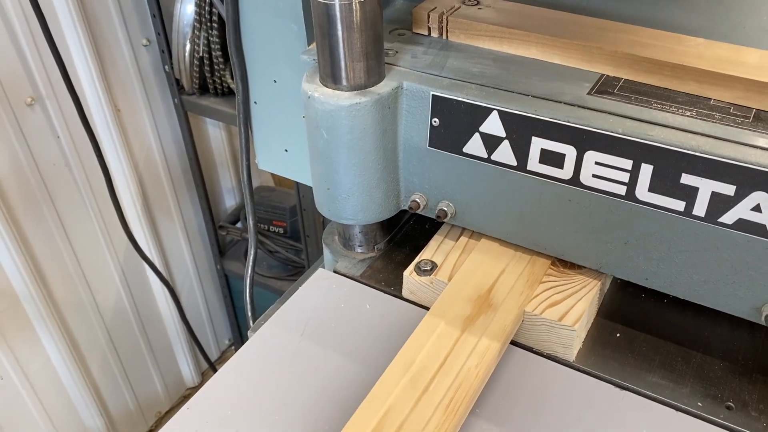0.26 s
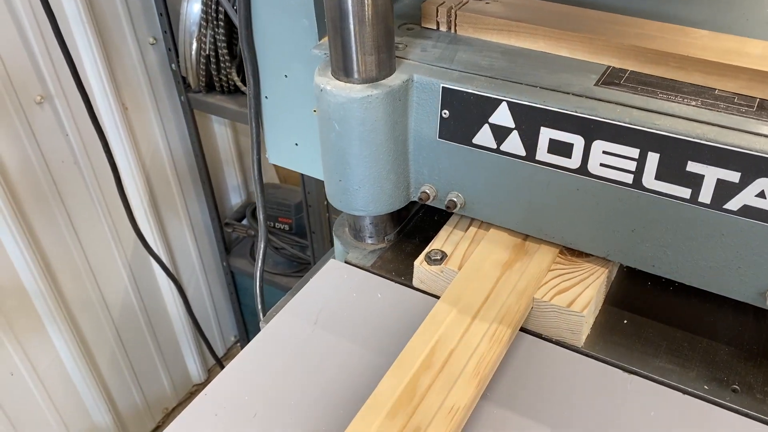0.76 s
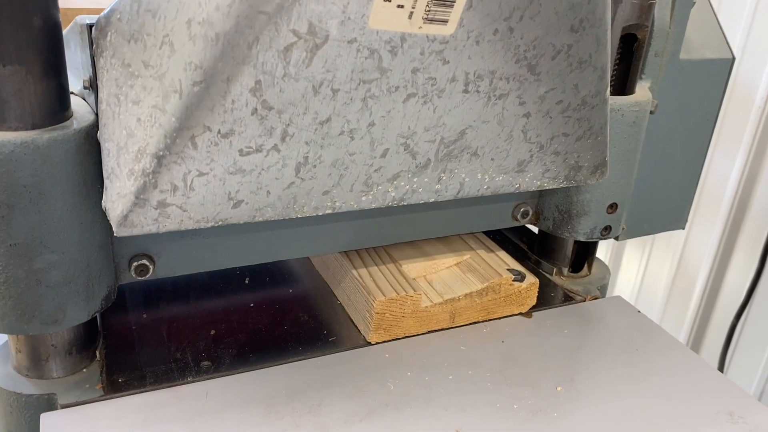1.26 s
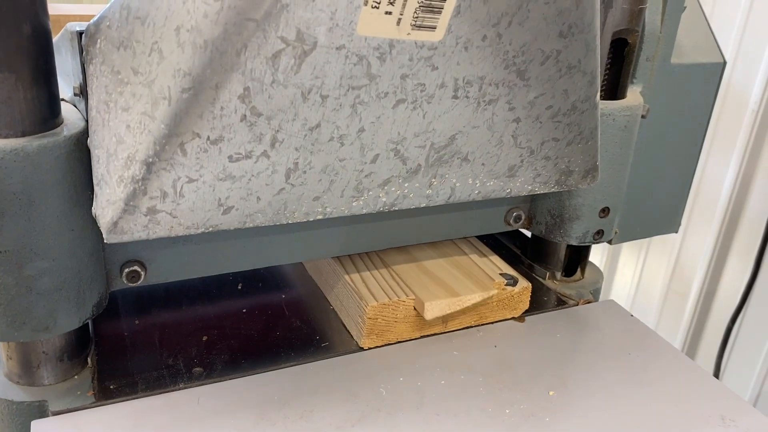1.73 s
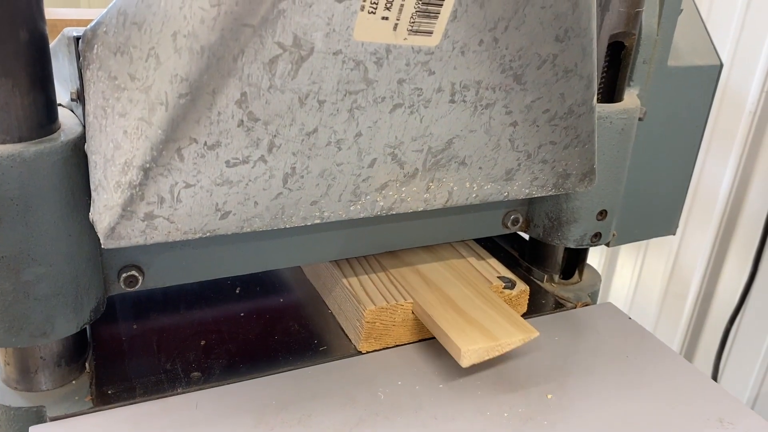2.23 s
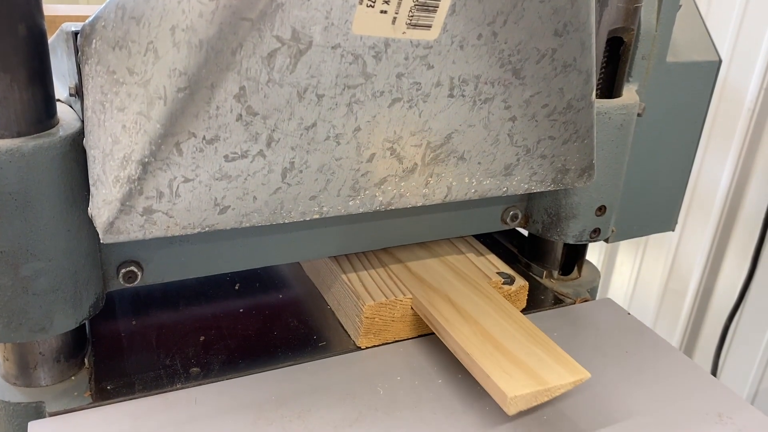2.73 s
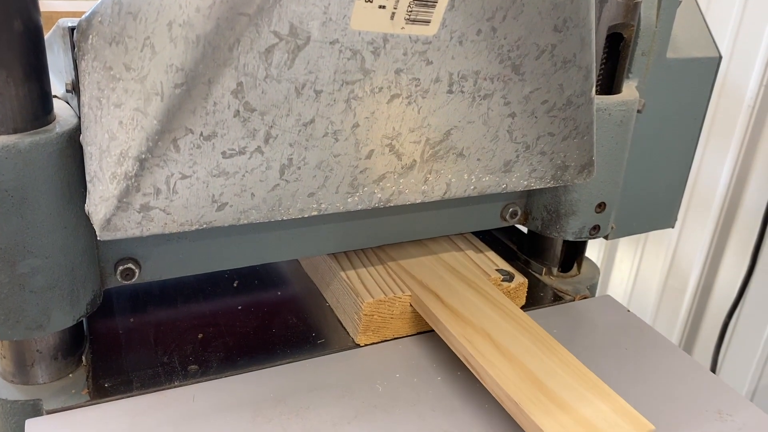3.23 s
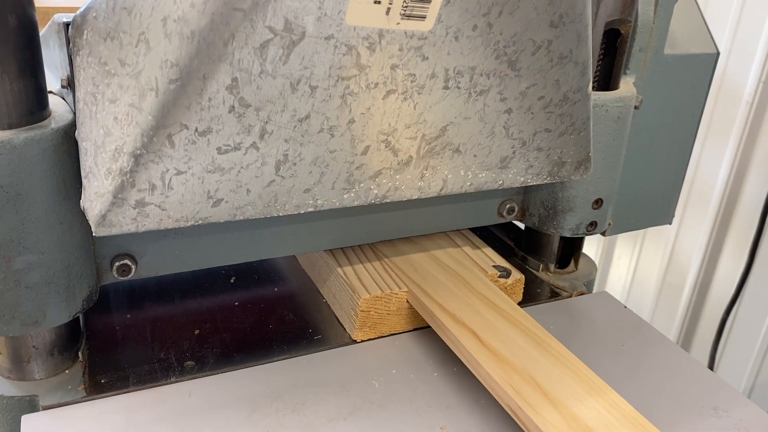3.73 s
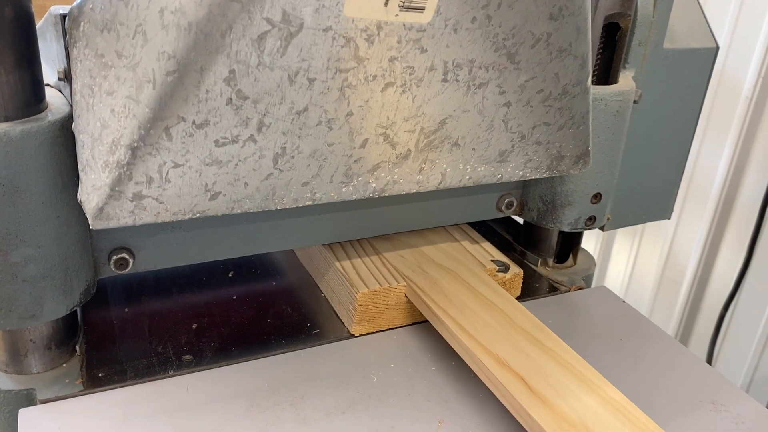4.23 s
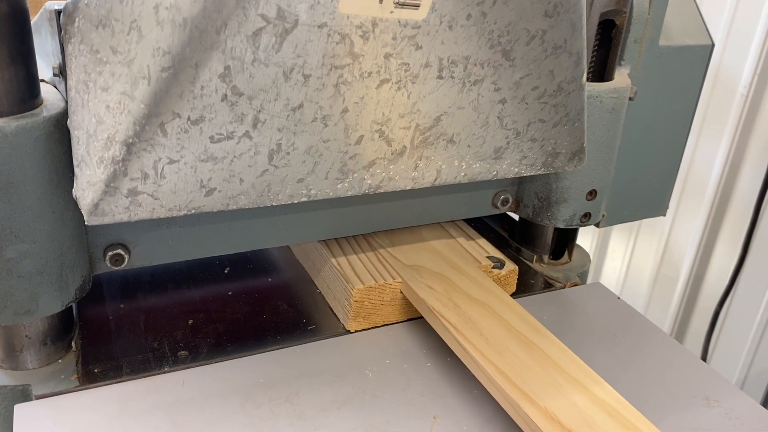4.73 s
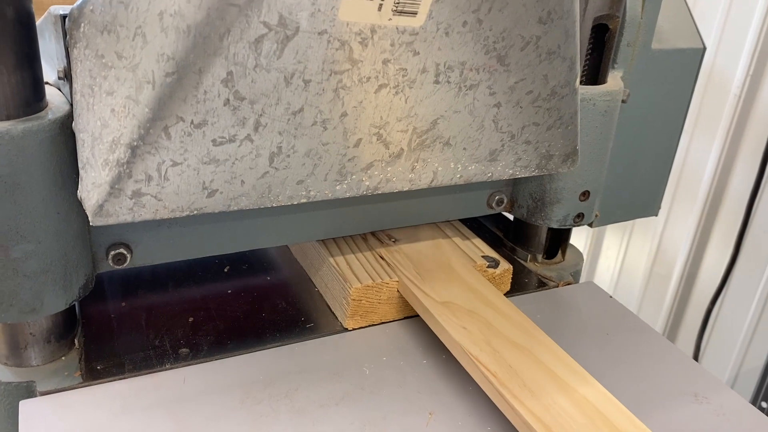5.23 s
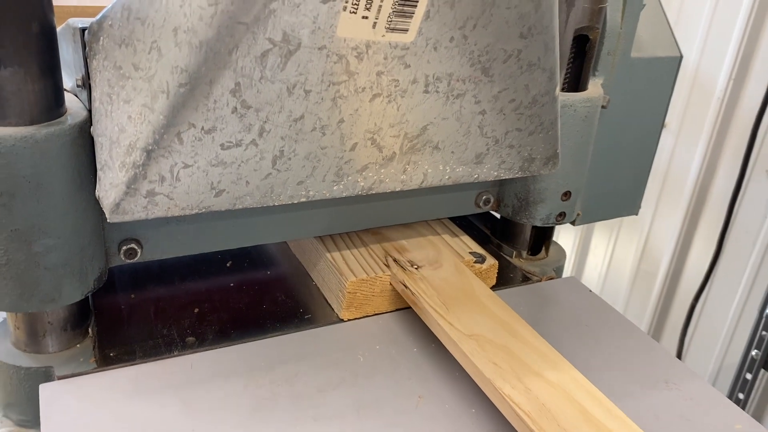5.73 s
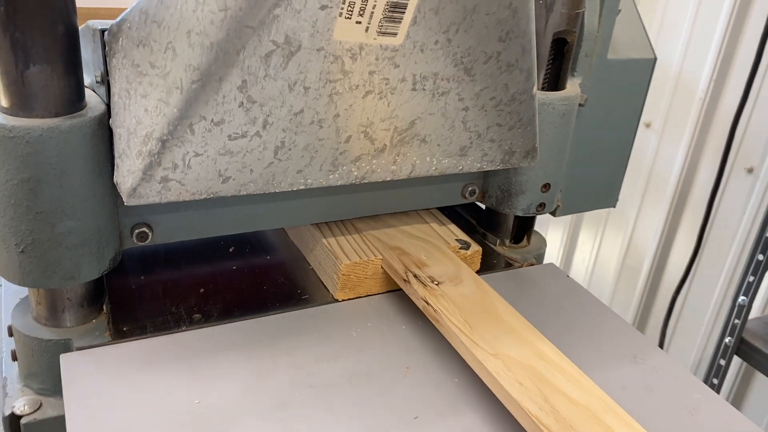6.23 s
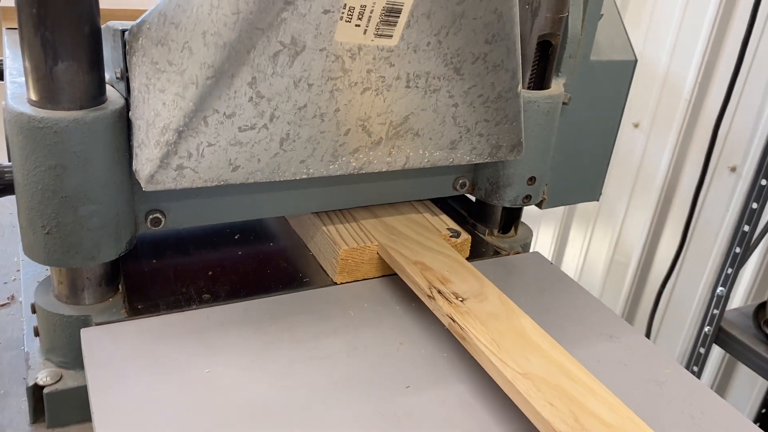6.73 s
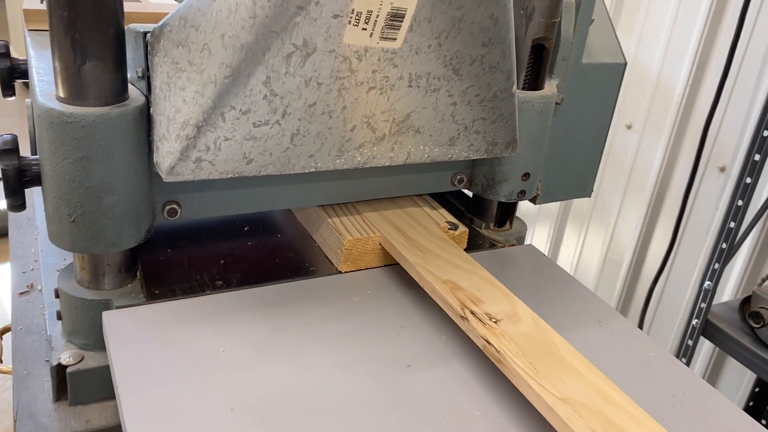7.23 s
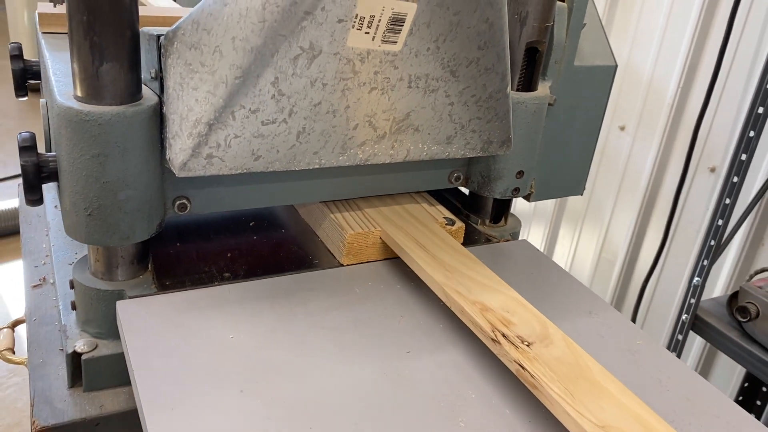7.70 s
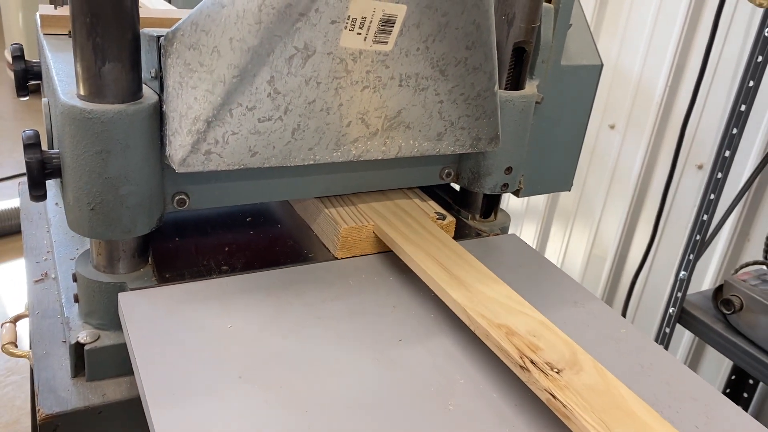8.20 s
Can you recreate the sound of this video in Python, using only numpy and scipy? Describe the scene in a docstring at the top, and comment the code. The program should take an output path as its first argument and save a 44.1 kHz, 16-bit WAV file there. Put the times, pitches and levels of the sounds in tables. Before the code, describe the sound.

Steady whine and buzz of a wood planer cutting a board, chips hissing and a few splinters snapping midway.

```python
"""A planer shaving a board

A three-knife thickness planer in a workshop is heard briefly where the board goes in (infeed), then
where it comes out (outfeed), by a hand-held pair of microphones that slowly backs away. Knife strokes
give a stack of tones, uneven knives the tones between. Chips hiss and tick in the hood over a roar
and a motor hum. The board slaps the table at first; later its grain tears and splinters break off."""
import sys
import numpy as np
from scipy import signal
from scipy.fft import rfft, irfft, next_fast_len
from scipy.io import wavfile
from scipy.ndimage import uniform_filter1d, map_coordinates

SR = 44100
rng = np.random.default_rng(int(sys.argv[2]) if len(sys.argv) > 2 else 0)


def wav_out(sig):
    """Save sig, one row per channel (or a flat mono array), as 16-bit PCM at SR to the path in sys.argv[1]."""
    wavfile.write(sys.argv[1], SR, np.round(np.clip(np.atleast_2d(sig).T, -1, 1) * 32767).astype(np.int16))


N = 373023
HOP, TURN_SAMPLES = 512, 2048  # samples per frame, and per stored turn of the cutter head
BIN_HZ = np.fft.rfftfreq(2048, 1 / SR)
MOVE_S = .83  # the listener jumps from infeed to outfeed
KNIFE_COUNT, INFEED_TURN_HZ, OUTFEED_TURN_HZ = 3, 106.86, 106.585
ORDERS = np.arange(148)  # the tone of order k vibrates k times per turn
# Tones that fade and swell on their own: order
FADING_ORDERS = (15, 18, 21, 24, 27, 30, 33, 36, 39, 45, 48, 51, 54, 57, 25, 28, 49, 52, 60, 42)


def amp(db):
    """Turn decibels into a gain."""
    return 10 ** (np.asarray(db) / 20)


def evened(x):
    """Scale a signal to an average power of 1."""
    return x / np.sqrt(np.mean(abs(x) ** 2) + 1e-20)


def at_pitch(table, hz):
    """Look up a table's value at any pitch."""
    pitches, values = np.transpose(table)
    return np.interp(np.log(hz + 1), np.log(pitches + 1), values)


def curves(table, t):
    """Join a table's timed points with straight lines."""
    times, *columns = np.transpose(table)
    return np.array([np.interp(t, times, column) for column in columns])


def drift(shape, frames):
    """Random wandering; more frames make it slower."""
    steps = rng.standard_normal(shape)
    return evened(uniform_filter1d(uniform_filter1d(steps, frames, axis=0), frames, axis=0))


def mic_phase(hz):
    """Half the phase lag of the left microphone; the spacing only matters in the treble."""
    agree_hz, repeat_hz = 6850, 4300
    return np.exp(1j * np.pi * np.maximum(hz - agree_hz, -600) / repeat_hz * (hz > 5000))


def stereo(x):
    """One source as the two microphones hear it."""
    size = next_fast_len(N)
    spectrum, phase = rfft(x, size), mic_phase(np.fft.rfftfreq(size, 1 / SR))
    return irfft(np.array([spectrum / phase, .8 * spectrum * phase]), size)[:, :N]


def noise(spectrum, level_db, patchy_db):
    """Noise with drifting loud patches, partly shared by both microphones."""
    # How alike the two sides are: pitch_hz, likeness (0-1)
    likeness = [(60, .97), (300, .96), (700, .7), (2000, .5), (5000, .75), (6500, .97), (15000, .99)]
    a, b, c, d = rng.standard_normal((4, len(level_db), len(BIN_HZ)))
    patches = evened(uniform_filter1d(drift(a.shape, frames=6), size=16, axis=1))
    same, left = at_pitch(likeness, BIN_HZ), a + 1j * b
    right = same * left + np.sqrt(1 - same ** 2) * (c + 1j * d)
    right *= amp(-2.4 * (abs(BIN_HZ - 3500) < 2500))  # the machine stands to the left
    colour, phase = amp(at_pitch(spectrum, BIN_HZ) + patchy_db * patches), mic_phase(BIN_HZ)
    spectra = evened(np.array([left / phase, right * phase]) * colour) * amp(level_db)
    sound = signal.istft(spectra.transpose(0, 2, 1), nperseg=2048, noverlap=2048 - HOP)[1]
    return sound[:, :N] / np.sqrt(2048 / 6)


def roughness(t):
    """Each stretch of cross grain ramps in, holds and ramps out."""
    # Cross grain: start_s, end_s, roughness (0-1)
    stretches = [(.58, .8, .2), (1.76, 1.9, .3), (2.95, 4.05, .9)]
    ramp_s = .08
    return sum(rough * np.clip(np.minimum(t - start, end - t) / ramp_s + .5, 0, 1)
               for start, end, rough in stretches)


def bite_share(order):
    """A deeper bite lifts most tones, but lowers those near order 29."""
    return 1 - 1.9 * np.exp(-((order - 29) / 3) ** 2)


def tone_fades(t):
    """As board and listener move, echoes cancel or lift single tones; the three brief dips of order 15 near 0.6
    s come as the board chatters on the infeed table."""
    # Dips and lifts, one list per fading order: centre_s, half_length_s, change_db
    fades = [
        [(.62, .012, -12), (.667, .012, -12), (.712, .012, -12), (3.1, .15, -9), (3.58, .13, -12),
         (5.15, .2, -11), (6.35, .35, -19), (7.8, .4, -10)],
        [(4.75, .17, -9), (5.5, .5, -6), (6.1, .15, -10), (6.95, .25, -17), (7.5, .17, -21)],
        [(1.3, .35, -7), (2.85, .2, -8), (3.7, .15, -8), (4.25, .17, -10), (5.7, .25, 5), (6.95, .17, -16),
         (7.9, .5, 7)],
        [(2.95, .35, 5), (5.6, .2, -9), (6.5, .3, -10), (7.4, .3, -9), (8.1, .3, -17)],
        [(1.45, .25, 12), (2.9, .15, 6), (4.5, .5, -6), (5.4, .3, 9), (7.9, .25, -7)],
        [(2.6, .25, 5), (4.6, .35, 7), (7.2, .4, 9)],
        [(1.1, .45, 7), (4.2, .25, 4), (5.7, .6, -7), (7.5, .9, -5)],
        [(4.55, .45, 4), (6.0, .5, -4), (7.5, .5, 5)],
        [(1.5, .3, -9), (2.3, .3, -12), (7.3, .2, 7), (8.0, .3, 6)],
        [(3.65, .35, -7), (7.75, .3, -9)],
        [(2.2, .4, 7), (4.8, .6, 6), (8.1, .3, 5)],
        [(1.0, .3, -12), (3.3, .4, -5), (7.6, .65, -21)],
        [(3.4, .5, -4)],
        [(1.2, .4, 5), (4.2, .2, -6)],
        [(4.6, .4, -10)],
        [(4.6, .4, -12)],
        [(7.6, 1.2, -13)],
        [(7.7, .9, -12)],
        [(6.2, 1.0, -8)],
        [(4.6, .4, 2)],
    ]
    change_db = np.zeros((len(t), len(ORDERS)))
    for order, rows in zip(FADING_ORDERS, fades):
        change_db[:, order] = sum(db * np.exp(-((t - at) / half) ** 2) for at, half, db in rows)
    return change_db


def whine(t, near_db, bite_db, wander):
    """The head's lower tones; mid is what both microphones share, side is how they differ."""
    # Knife stroke tones: order, infeed_db, outfeed_mid_db, outfeed_side_db, side_phase_rad
    knife_tones = [(3, -46.5, -50.0, -64, 4), (6, -50.5, -44.5, -49.5, 1.59), (9, -68, -48.5, -54, 0.7),
                   (12, -51.5, -50.5, -58.5, 1.5), (15, -42.5, -51.5, -55.5, 1.6),
                   (18, -52, -46, -52.5, 0.9), (21, -48.5, -49.0, -52.5, -0.6), (24, -50, -53, -54, 0.8),
                   (27, -54.5, -61.5, -61, 1), (30, -55, -59, -61, 0.3), (33, -61, -51.5, -61.0, -1.8),
                   (36, -59, -58.5, -59.5, 0), (39, -78, -53.5, -63, -3.3), (42, -64, -59.5, -68, -1.5),
                   (45, -76.0, -51, -69, -1), (48, -86, -62, -67, -0.5), (51, -64.5, -53, -57, 1),
                   (54, -66, -57.5, -55, -1.5), (57, -64, -59, -63.5, -0.3), (60, -68, -59, -63.0, 0)]
    # Tones from uneven knives and imbalance: order, infeed_db, outfeed_db
    shaft_tones = [(1, -63.0, -64), (13, -61, -74), (14, -59, -92), (16, -53, -77.5), (19, -64, -65),
                   (20, -58, -72), (22, -59, -60.5), (23, -71.0, -63), (25, -61.5, -61.5), (28, -57.5, -60),
                   (49, -75, -60), (50, -88, -64), (52, -75, -61), (55, -74, -72), (58, -72, -73)]
    outfeed = (t > MOVE_S)[:, None]
    # High orders fill the room, so distance dims them less.
    follow_db = np.outer(near_db, np.clip((45 - ORDERS) / 18, .2, 1))
    follow_db += np.outer(bite_db, (ORDERS >= 14) * bite_share(ORDERS))
    faded_db = follow_db + tone_fades(t)
    # Unlisted tones are faint, and stronger just above a knife tone than just below.
    faint_db = np.where(ORDERS % KNIFE_COUNT == 1, -68, -72) - 5 * (ORDERS < 18)
    mid_db = faint_db + faded_db + 1.5 * rng.standard_normal(len(ORDERS))
    orders, infeed_db, outfeed_db = np.transpose(shaft_tones)
    at = orders.astype(int)
    mid_db[:, at] = np.where(outfeed, outfeed_db, infeed_db) + faded_db[:, at]
    side_db = mid_db - np.clip(14 - ORDERS, 6, 14)
    side_rad = rng.uniform(0, 2 * np.pi, len(ORDERS))
    orders, infeed_db, outfeed_db, outfeed_side_db, phase_rad = np.transpose(knife_tones)
    at = orders.astype(int)
    mid_db[:, at] = np.where(outfeed, outfeed_db, infeed_db) + faded_db[:, at]
    side_db[:, at] = np.where(outfeed, outfeed_side_db, infeed_db - 5) + follow_db[:, at]
    side_rad[at] = phase_rad
    waver_db = np.where(np.isin(ORDERS, FADING_ORDERS), 1.5, 2.9) * wander
    mid = amp(mid_db + waver_db * drift(mid_db.shape, frames=14))
    side = amp(side_db + 3.5 * wander * drift(mid.shape, frames=30))
    side = side * np.exp(1j * (side_rad + .6 * wander * drift(mid.shape, frames=40)))
    return np.array([mid + side, mid - side])


def buzz(t, near_db, bite_db, bright):
    """The head's highest tones merge into a buzz, the knife stroke tones strongest."""
    # Buzz colour: pitch_hz, relative_db
    spectrum = [(6400, -4), (7500, 0), (9000, -9.5), (11000, -7), (13000, -12.5), (15700, -13)]
    hz = ORDERS * OUTFEED_TURN_HZ
    tone_db = at_pitch(spectrum, hz) + 8.5 * (ORDERS % KNIFE_COUNT == 0)
    tones = amp(tone_db + 4 * drift((len(t), len(hz)), frames=20)) * bright
    tones /= np.sqrt((tones ** 2).sum(1).mean())
    level_db = -47.7 + .8 * bite_db + .7 * near_db - 5 * (t < MOVE_S)
    # The top follows the bite more, the lower part the distance.
    tilt_db = np.outer(bite_db, .3 * (hz > 9000)) + np.outer(near_db, .25 * (hz < 9000))
    tones *= amp(level_db[:, None] + tilt_db)
    return np.array([tones / mic_phase(hz), tones * mic_phase(hz)])


def cutter_head(t, turns, near_db, bite_db):
    """Knives strike the wood: one turn's slowly changing wave repeats at the speed of the head."""
    shape, bright, infeed = (len(t), len(ORDERS)), ORDERS > 60, (t < MOVE_S)[:, None]
    wander = np.clip(ORDERS / 30, .03, 1.5)  # short waves feel every small move
    tones = whine(t, near_db, bite_db, wander) * ~bright + buzz(t, near_db, bite_db, bright)
    # Echoes smear the sharp stroke.
    smear_rad = np.where(bright, .8, 1.1) * rng.standard_normal(len(ORDERS))
    smear_rad = smear_rad + .6 * wander * drift(shape, frames=12)
    # The grain makes strokes uneven: neighbouring tones flutter together, high ones most.
    grain = evened(uniform_filter1d(drift(shape, frames=1), size=4, axis=1))
    unevenness = 1.5 + .7 * roughness(t)[:, None]
    flutter_db = unevenness * np.clip(ORDERS / 40, 0, 1.6) * grain
    # The board chatters on the infeed table, shaking low orders most.
    chatter_hz, chatter_db = 21.5, 4.5 * 8 / np.maximum(ORDERS, 8) * (ORDERS > 4)
    chatter = np.cos(2 * np.pi * chatter_hz * t[:, None] + rng.uniform(0, 2 * np.pi, len(ORDERS)))
    flutter_db += infeed * (chatter_db * chatter + 2.2 * (ORDERS > 10) * drift(shape, frames=1))
    smear_rad += .14 * unevenness * np.clip(ORDERS / 60, 0, 2.2) ** 2 * drift(shape, frames=2)
    tones *= amp(flutter_db) * np.exp(1j * smear_rad) * (ORDERS > 0)
    waves = irfft(tones, TURN_SAMPLES) * TURN_SAMPLES / np.sqrt(2)
    waves = np.concatenate([waves, waves[..., :1]], axis=2)  # close the loop
    place = [np.arange(N) / HOP, turns % 1 * TURN_SAMPLES]
    return np.array([map_coordinates(wave, place, order=1) for wave in waves])


def machine_roar(t, near_db):
    """A broad roar, with more deep rumble on the infeed side."""
    # Roar colour: pitch_hz, relative_db
    spectrum = [(30, -27), (55, -4), (110, 0), (160, -6), (220, 5), (340, -2), (420, -1.5), (1000, -3),
                (2500, -6.5), (6000, -27)]
    rumble_db = 5 * np.outer(t < MOVE_S, BIN_HZ < 100)
    return noise(spectrum, -54.5 + near_db[:, None] + rumble_db, patchy_db=1.0)


def motor(t, sample_s, near_db):
    """Motor, belt and feed gears hum, wavering in level."""
    # Hums: pitch_hz, level_db
    hums = [(199, -68.5), (350, -63), (700, -68), (746, -71), (1050, -72)]
    waver_db = near_db[:, None] + 4 * drift((len(t), len(hums)), frames=6)
    return sum(np.interp(sample_s, t, amp(db + waver_db[:, k])) * np.sin(2 * np.pi * hz * sample_s)
               for k, (hz, db) in enumerate(hums))


def chip_hiss(t, sample_s, turns, near_db, bite_db):
    """Chips fly in hissing bursts, one per knife stroke, louder in cross grain."""
    # Hiss colour: pitch_hz, relative_db
    spectrum = [(900, -6), (1500, -11), (2300, 6), (3600, 6.5), (5200, 7), (6200, 1.5), (7600, 2),
                (9000, -9), (11000, 0), (15700, -28)]
    stroke = (KNIFE_COUNT * turns).astype(int)
    stroke_db = (1.5 + 2.5 * roughness(sample_s)) * rng.standard_normal(stroke[-1] + 1)[stroke]
    stroke_db += 2 * (stroke % KNIFE_COUNT == 0)  # one knife leads
    bursts = evened(.5 + 1.5 * amp(stroke_db) * np.exp(-(KNIFE_COUNT * turns % 1) / .2))
    level_db = -55.3 + .1 * near_db + 7 * roughness(t)
    lift_db = .7 * np.outer(bite_db, bite_share(BIN_HZ / OUTFEED_TURN_HZ))
    return noise(spectrum, level_db[:, None] + lift_db, patchy_db=3.8) * bursts


def hood_ticks(sample_s, turns):
    """Each stroke throws chips that ring the hood; one knife throws the most."""
    # The hood's ringing notes: pitch_hz, width_hz, relative_db
    hood_notes = [(2400, 700, -4), (3800, 500, -2), (5200, 900, -6), (7400, 900, 4.5), (11000, 3000, -8)]
    stroke = np.floor(KNIFE_COUNT * turns)
    at = np.flatnonzero(np.diff(stroke, prepend=0))
    hit_db = -66 + 18 * roughness(sample_s[at]) - 6 * (stroke[at] % KNIFE_COUNT > 0)
    hit_db += 2.2 * np.minimum(rng.exponential(1, len(at)), 3)
    t, out = np.arange(400) / SR, np.zeros(N)
    for hz, width, db in hood_notes:
        hits = np.zeros(N)
        hits[at] = amp(hit_db + db) * rng.standard_normal(len(at))
        ring = 10 * t * width * np.exp(-np.pi * width * t) * np.sin(2 * np.pi * hz * t)
        out += signal.oaconvolve(hits, ring)[:N]
    return stereo(out)


def knocks(rows, filter_order, spread, rise_s, fall_s):
    """Each knock is a short burst of noise around its own pitch."""
    t, out = np.arange(1800) / SR, np.zeros(N)
    envelope = (1 - np.exp(-t / rise_s)) * np.exp(-t / fall_s)
    for start_s, db, hz in rows:
        band = signal.butter(filter_order, [hz * (1 - spread), hz * (1 + spread)], "bandpass", fs=SR)
        burst = evened(signal.lfilter(*band, rng.standard_normal(len(t)))) * envelope
        part = out[int(start_s * SR):][:len(t)]
        part += amp(db) * burst[:len(part)]
    return stereo(out)


def board_slaps():
    """The board slaps the infeed table, sounding a high note and a softer low one."""
    # Slaps: start_s, level_db, pitch_hz
    slaps = [(.055, -44, 3300), (.158, -43, 3100), (.612, -40, 3650), (.659, -39, 3700), (.705, -39, 3700),
             (.752, -43, 3600)]
    low_notes = [(start_s, db - 3, 2300) for start_s, db, _ in slaps]
    return knocks(slaps + low_notes, filter_order=2, spread=.07, rise_s=.003, fall_s=.009)


def tearing_grain(sample_s, turns):
    """Grain tears out with a falling rasp that pulses once a turn."""
    # The rasp's path: time_s, pitch_hz, level_db
    path = [(2.85, 2700, -70), (3.0, 2650, -52), (3.17, 2500, -45), (3.3, 2250, -50), (3.42, 2050, -65)]
    on = (sample_s > path[0][0]) & (sample_s < path[-1][0])
    hz, db = curves(path, sample_s[on])
    pole = np.exp(-np.pi * 500 / SR)  # sets the width of the noise band
    a, b = rng.standard_normal((2, 2, N))[..., on]
    rasp = evened(signal.lfilter([1], [1, -2 * pole, pole * pole], a + 1j * b))
    slide = np.exp(2j * np.pi * np.cumsum(hz) / SR)
    pulse = evened(.2 + np.exp(-(turns[on] % 1) / .3))
    out = np.zeros((2, N))
    out[:, on] = ((rasp + rasp[0]) * slide).real * amp(db) * pulse
    return out


def splinters():
    """Splinters break off with sharp snaps."""
    # Snaps: start_s, level_db, pitch_hz
    snaps = [(3.371, -35, 2100), (3.578, -36, 3900), (3.625, -34, 7300), (3.671, -35, 3600),
             (3.757, -35, 2600), (3.776, -34, 2500), (3.628, -33, 2200), (3.962, -35, 2600)]
    return knocks(snaps, filter_order=1, spread=.15, rise_s=.0004, fall_s=.004)


def scene():
    """Spin the cutter head and add up the sounds of machine and wood."""
    # How near the listener is: time_s, relative_db
    nearness = [(0, 1), (.825, 0), (.835, 2), (3, 0), (4.5, 1), (5.1, -2.5), (6.3, -4.5), (8.46, -6)]
    # How deep the knives bite: time_s, relative_db
    bite = [(0, .5), (.3, -2.5), (.825, 3), (.835, 2), (1.72, -.5), (1.77, 3.5), (2.4, 2), (3.0, 1),
            (3.6, -1.5), (4.2, 2), (4.3, 5), (4.93, 7), (5.03, .5), (6.2, 1), (6.9, 2), (7.7, 0), (8.46, 3)]
    t, sample_s = np.arange(N // HOP + 5) * HOP / SR, np.arange(N) / SR  # frame and sample times
    near_db, bite_db = curves(nearness, t)[0], curves(bite, t)[0]
    sag_hz = .016 * curves(bite, sample_s)[0]  # a deeper bite slows the head
    turns = np.cumsum(np.where(sample_s < MOVE_S, INFEED_TURN_HZ, OUTFEED_TURN_HZ) - sag_hz) / SR
    roar = machine_roar(t, near_db)
    chips = chip_hiss(t, sample_s, turns, near_db, bite_db) + hood_ticks(sample_s, turns)
    wood = tearing_grain(sample_s, turns) + splinters() + board_slaps()
    return cutter_head(t, turns, near_db, bite_db) + roar + chips + wood + motor(t, sample_s, near_db)


def record(dry):
    """The microphones thin the deepest bass; then the highest treble is cut."""
    thin = signal.lfilter(*signal.butter(2, 46, "highpass", fs=SR), dry)
    treble_cut = signal.firwin(511, 15800, window=("kaiser", 9), fs=SR)
    return signal.oaconvolve(thin, treble_cut[None], "same")


dry = scene()
out = record(dry)
wav_out(out)
```